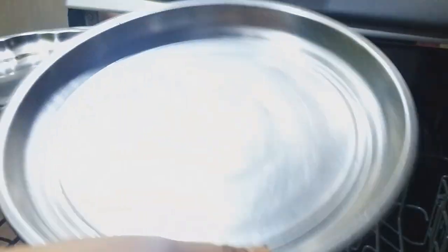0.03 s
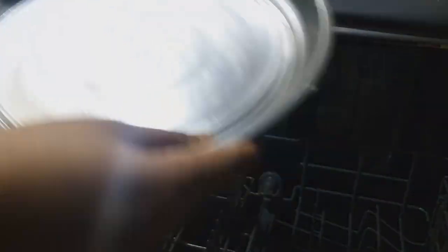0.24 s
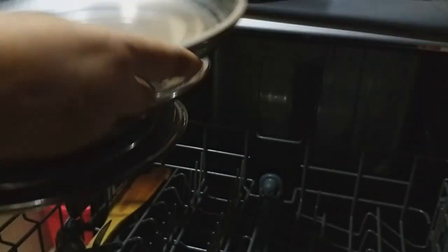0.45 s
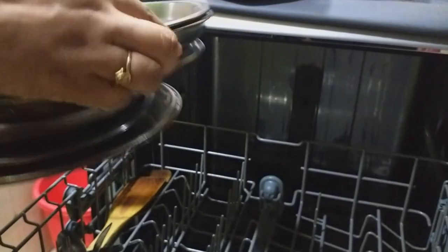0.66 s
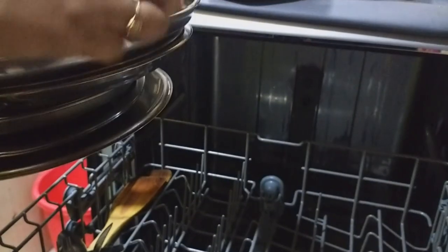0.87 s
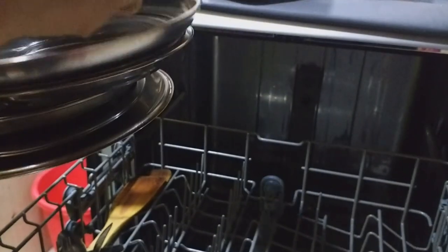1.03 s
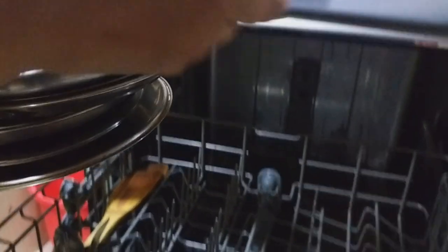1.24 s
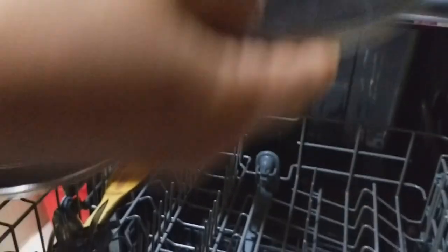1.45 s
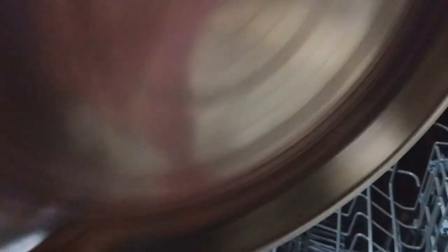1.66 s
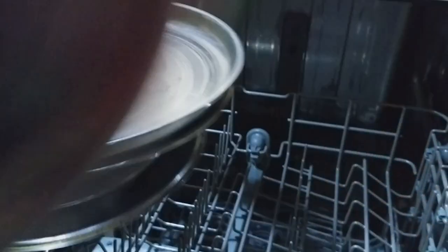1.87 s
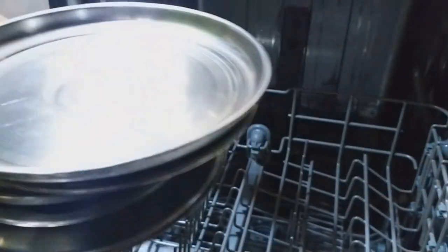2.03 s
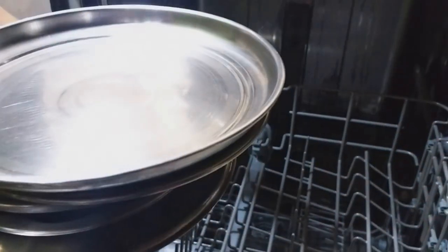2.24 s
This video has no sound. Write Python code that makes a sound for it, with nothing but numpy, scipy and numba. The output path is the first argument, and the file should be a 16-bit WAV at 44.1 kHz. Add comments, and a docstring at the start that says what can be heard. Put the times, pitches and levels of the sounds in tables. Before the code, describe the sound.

Steel plates clatter loudly onto a pile, followed by quieter clinks and shuffling, tiny rim ticks and a brief hand slide, then a bright ringing double clang, close up in a small quiet kitchen.

```python
"""Stacking steel plates

Steel plates are stacked by hand close to a phone in a small kitchen. One crashes and rattles onto the pile,
the pile is shuffled, rims tick, then the top plate is dropped back twice and rings freely.
Each impact is a train of contact forces convolved with decaying modes: sharp lines and dense random swarms.
A plate sings faintly, hands slide and the pile rumbles as shaped noise or modes; a quiet room hums behind."""
import sys
import numpy as np
from scipy import signal
from scipy.fft import rfft, irfft
from scipy.io import wavfile
from numba import njit

SR = 44100
rng = np.random.default_rng(int(sys.argv[2]) if len(sys.argv) > 2 else 0)


def wrap_up_sound(samples):
    """Save the sound to the file named by the first command line argument, as 16-bit audio."""
    columns = np.atleast_2d(samples).T
    # keep every value between -1 and 1, then stretch to whole-number steps
    tamed = np.clip(columns, -1, 1)
    steps = np.round(tamed * 32767).astype(np.int16)
    wavfile.write(sys.argv[1], SR, steps)


def boost(x):
    """Linear amplitude factor 10**(x/20) for a level x in decibels (scalar or array-like)."""
    u = np.asarray(x, float) / 20
    return 10 ** u


N = 99225  # samples in the scene
TOP_HZ = 15900  # upper limit of the modes and of the phone


def on_log(table, hz):
    """Logarithmic frequency scale: interpolates (frequency [Hz], value) points along it."""
    table = np.array(table, float)
    return np.interp(np.log(hz), np.log(table[:, 0]), table[:, 1])


def band(x, lo_hz, hi_hz):
    """Band-pass filtering by a Butterworth response."""
    return signal.sosfilt(signal.butter(2, [lo_hz, hi_hz], "bandpass", fs=SR, output="sos"), x)


def unit(x):
    """Power normalisation: scales to rms 1."""
    return x / np.sqrt(np.mean(x ** 2))


def curve(rows):
    """Amplitude envelope: gain through (time [s], level [dB]) points, fading out beyond the ends."""
    rows = np.array(rows, float)
    t = np.r_[rows[0, 0] - .05, rows[:, 0], rows[-1, 0] + .02]
    level_db = np.r_[-110, rows[:, 1], -110]
    return boost(np.interp(np.arange(N) / SR, t, level_db))


@njit
def decay(pole, left, right, count):
    """Modal superposition: sums exponentially dying sines at both microphones."""
    out = np.zeros((2, count))
    for k in range(len(pole)):
        z = 1 + 0j
        for i in range(count):
            out[0, i] += (z * left[k]).imag
            out[1, i] += (z * right[k]).imag
            z *= pole[k]
            if abs(z.real) + abs(z.imag) < 1e-3:
                break
    return out


def ring(modes, lag_s, scatter=0., pan_db=0., spot_db=0.):
    """Modal impulse response, one second in stereo: the struck spot sets each mode's sign and strength."""
    hz, db, t60 = np.array(modes, float).T
    sign, spot, tilt, phase = rng.standard_normal((len(hz), 4)).T
    pole = np.exp(2j * np.pi * hz / SR - np.log(1000) / (np.maximum(t60, .01) * SR))
    # Scatter blurs left and right, fully so above 2300 Hz.
    blur = scatter * np.minimum(hz / 2300, 1)
    gain = np.sign(sign) * boost(db + spot_db * spot)
    # Panning weakens above 2 kHz.
    pan = pan_db * np.minimum(2000 / hz, 1) + 3 * blur * tilt
    turn = 2 * np.pi * hz * lag_s + blur * phase
    left = gain * boost(pan / 2) + 0j
    right = gain * boost(-pan / 2) * np.exp(-1j * turn)
    return decay(pole, left, right, SR)


def swarm(colour, t60s, lag_s, scatter, pan_db=0., t60_factor=1, count=320):
    """High modal density: close random modes under a spectral colour, starting near rms 1."""
    lo, hi = colour[0][0], min(colour[-1][0], TOP_HZ)
    grid = lo + (hi - lo) * (np.arange(count + 1) / count) ** 1.5
    hz = grid[:-1] + np.diff(grid) * rng.random(count)
    # Wider cells hold more power.
    db = on_log(colour, hz) + 10 * np.log10(np.diff(grid))
    t60 = t60_factor * on_log(t60s, hz) * np.exp(0.13 * rng.standard_normal(count))
    response = ring(np.c_[hz, db, t60], lag_s, scatter, pan_db, spot_db=3)
    return response / np.sqrt(np.sum(boost(db) ** 2))


CONTACTS_PER_S, CONTACT_SPREAD_DB, CHATTER_DB = 550, 4.5, -12.5
SPLIT_HZ = 857, 4920  # borders of lows, mids and treble
FAVOUR_DB, FAVOUR_WIDTH = 1.5, 0.099  # added band's gain; its half-width as a share of the favoured pitch
LEAD = 200  # samples before a contact, for the zero-phase filters to spread into


def rattle(low_db, mid_db, high_db, fade_s, favour_hz, chatter_db):
    """Repeated impact: a first contact and fading random chatter, each band with its own strength."""
    t = np.arange(-LEAD, SR // 5) / SR
    chance, size = rng.random((2, len(t)))
    spread_db = CONTACT_SPREAD_DB * np.minimum(-np.log(size + 1e-9), 2)
    size_db = chatter_db + spread_db - 60 * t / max(fade_s, .005)
    contact = (chance < CONTACTS_PER_S / SR) * (t > 0)
    polarity = np.sign(chance * SR / CONTACTS_PER_S - .5)
    taps = contact * boost(size_db) * polarity
    taps[LEAD] = 1.0  # the first contact
    low, below = (signal.sosfiltfilt(signal.butter(2, hz, fs=SR, output="sos"), taps) for hz in SPLIT_HZ)
    force = boost(low_db) * low + boost(mid_db) * (below - low) + boost(high_db) * (taps - below)
    favoured = band(force, favour_hz * (1 - FAVOUR_WIDTH), favour_hz * (1 + FAVOUR_WIDTH))
    return force + boost(FAVOUR_DB) * favoured


def strike(hits, response, chatter_db=CHATTER_DB, count=SR // 2):
    """Convolution of force with response(time), asked anew for every hit as the plates shift."""
    out = np.zeros((2, N + 2 * SR))
    for s, *force in hits:
        contacts = rattle(*force, chatter_db)
        hit = signal.fftconvolve(contacts[None], response(s)[:, :count], axes=1)
        i = int(s * SR) - LEAD
        out[:, i:i + hit.shape[1]] += hit
    return out[:, :N]


# Sharp modes of the pile: (frequency [Hz])
PILE_HZ = [207, 560, 594, 647, 681, 985, 1132, 1485, 1785, 1674, 2035, 2330, 2774, 3116, 3171, 3223, 3735,
           4496, 5420, 6890]
# The same modes: (relative level [dB], t60 when let go [s])
PILE_MODES = [(-25, 0.34), (-9, 0.25), (-4.5, 0.27), (-18, 0.25), (-8, 0.25), (-11.5, 0.18), (-17.5, 0.21),
              (-9, 0.094), (-25, 0.17), (-23.5, 0.64), (-12.5, 0.21), (-13.5, 0.25), (-18, 0.17),
              (-19.5, 0.067), (-7.5, 0.099), (-15, 0.2), (-20, 0.16), (-23, 0.11), (-16, 0.078),
              (-19.5, 0.2)]
# Dense modes of the pile: colour (frequency [Hz], relative level [dB]), decay when let go (frequency [Hz], t60 [s])
PILE_SWARM = [(71, -67.5), (120, -27), (473, -21.5), (580, -8), (856, -11.5), (1260, -7.5), (3240, -7.5),
              (3520, -10.5), (5520, -12), (16000, -26.5)], [(200, 0.38), (700, 0.34), (2000, 0.23),
              (6000, 0.12), (15000, 0.13)]
# Contacts within the pile: (time [s], lows [dB], mids [dB], treble [dB],
# chatter's fall by 60 dB [s] (5 ms at least), favoured pitch [Hz])
PILE_HITS = [(.0667, -65, -38.5, -36, 0.28, 2930), (.2114, -45, -39, -38, 7.5, 1560),
             (.2245, -54, -38.5, -30, 0.2, 1590), (.2433, -29.5, -8, -9, 0.06, 1450),
             (.262, -15, -14.5, -6.5, -0.1126, 3010), (.278, -20, -10.5, -11, -0.0958, 3200),
             (.2922, -17, -15, -13.5, 0.0764, 3080), (.315, -19.5, -19.5, -18, 0.01, 3560),
             (.345, -28, -27, -30.5, 0.46, 2150), (.43, -34.5, -39, -36.5, 0.75, 1720),
             (.5651, -42, -39, -24, -0.5, 10900), (.5786, -26.5, -34.5, -26.5, 0.14, 1010),
             (.594, -27, -34, -26.5, -0.03, 4680), (.61, -33, -40, -37, 0.94, 903),
             (.6569, -35.5, -37, -32.5, 0.35, 2280), (.7090, -44.5, -36.5, -27, 0.25, 4970),
             (.735, -58, -67, -49, 0.24, 4900), (.8091, -49.5, -43.5, -45, 0.66, 625),
             (.8964, -35.5, -40.5, -28.5, 0.2, 644), (.945, -53, -49, -53, 0.6, 597),
             (1.0286, -50, -51.5, -47.5, -0.62, 2010)]
PILE_LINES_DB, PILE_LAG_S = -2.5, 0.00019  # the right microphone hears later
FREE_S = .2, .54  # the pile is let go between these times
HELD_DAMP = 0.53  # t60 factor of resting hands


def pile():
    """Contact damping: hands resting on the pile shorten its swarm and all but its deepest sharp mode."""
    def response(s):
        """Modal response of the pile, held or let go at this time."""
        damp = 1 if FREE_S[0] < s < FREE_S[1] else HELD_DAMP
        t60_factors = [[1, 1, damp if hz > PILE_HZ[0] else 1] for hz in PILE_HZ]
        lines = np.c_[PILE_HZ, PILE_MODES] * t60_factors
        dense = swarm(*PILE_SWARM, PILE_LAG_S, 2.39, t60_factor=damp, count=440)
        return dense + boost(PILE_LINES_DB) * ring(lines, PILE_LAG_S, 0.65, spot_db=2.5)
    return strike(PILE_HITS, response)


# Sharp modes of the top plate: (frequency [Hz])
TOP_PLATE_HZ = [521, 704, 845, 879, 1074, 1108, 1262, 1320, 1510, 1560, 1588, 1862, 2144, 2246, 2476, 2860,
                2954, 3013, 3316, 3443, 3486, 3807, 3883, 4004, 4286, 4397, 4770, 4966, 5530, 6064, 6099,
                6644, 7321, 2882, 2931, 3682, 5378, 6595, 7246, 7822]
# The same modes: (relative level [dB], t60 [s])
TOP_PLATE_MODES = [(-12, 1.4), (-8.5, 1.6), (-5, 1.6), (1.5, 1.06), (10, 2.76), (-16, 3.7), (-12.5, 5),
                   (-5, 1.17), (9, 0.68), (11.5, 0.6), (0.5, 0.97), (14.5, 0.31), (-15, 0.47), (-33, 0.37),
                   (-10.5, 0.506), (-2, 0.85), (-4.5, 0.93), (-22, 0.13), (-5.5, 2.4), (2, 0.26),
                   (-8.5, 1.03), (-4.5, 0.98), (-12.5, 1.1), (0.5, 0.42), (-11.5, 1.1), (-14, 1.4),
                   (-8.5, 0.47), (-6.5, 0.36), (-16, 0.71), (2, 0.38), (-10.5, 0.87), (-17.5, 1.7),
                   (-22, 0.62), (-8, 0.67), (-16.5, 1.3), (-18, 0.75), (-21, 0.74), (-8.5, 0.24),
                   (-30.5, 0.22), (-31, 0.2)]
# Sharp modes of the plate beneath: (frequency [Hz])
UNDER_PLATE_HZ = [391, 567, 1285, 2362, 2519, 3370, 4342, 4783, 5608, 6950, 7908, 8296, 9549, 11372]
# The same modes: (relative level [dB], t60 [s])
UNDER_PLATE_MODES = [(-8, 0.14), (-12, 0.64), (-3, 0.74), (-2, 0.034), (-6, 0.38), (-12, 0.6), (-18, 0.81),
                     (-20, 0.93), (0.5, 0.076), (2, 0.096), (-10.5, 0.069), (-6.5, 0.062), (-4, 0.041),
                     (-0.5, 0.116)]
# Dense modes of the plates: colour (frequency [Hz], relative level [dB]), decay (frequency [Hz], t60 [s])
PLATE_SWARM = [(47, -63), (80, -18.5), (858, -4.5), (1370, -23), (2180, -7.5), (2780, -29.5), (5520, -17.5),
               (6170, -16), (6740, -15.5), (7870, -16), (16000, -21)], [(200, 0.047), (700, 0.16),
               (2000, 0.22), (6000, 0.1), (15000, 0.061)]
# Colour of faint modes between the plate's tones: (frequency [Hz], relative level [dB])
SHIMMER = [(300, -7), (4500, -8), (10000, -30)]
# Contacts of the two drops: (time [s], lows [dB], mids [dB], treble [dB],
# chatter's fall by 60 dB [s] (5 ms at least), favoured pitch [Hz])
PLATE_HITS = [(1.8432, -14, -16, -12, 0.067, 2186), (1.8515, -32.5, -24.5, -16.5, 0.04, 6660),
              (1.8575, -29, -13, -15, 0.042, 2270), (1.947, -37, -24.5, -21, 0.068, 2930),
              (1.954, -39, -25, -28, 0.08, 2310)]
PLATE_LINES_DB, UNDER_DB, SHIMMER_DB = -13.5, -3.5, -23
SHIMMER_LONGER = 9.5  # t60 factor of the shimmer
PLATE_LAG_S, PLATE_PAN_DB = 0.0004022, 4.5  # right hears later; the lows lean left


def dropped_plate():
    """Free vibration: the first contact of each drop starts sharp modes, every contact a dense swarm."""
    top = boost(PLATE_LINES_DB) * ring(np.c_[TOP_PLATE_HZ, TOP_PLATE_MODES], PLATE_LAG_S, 0, PLATE_PAN_DB)
    under = boost(UNDER_DB) * ring(np.c_[UNDER_PLATE_HZ, UNDER_PLATE_MODES], PLATE_LAG_S, 0, PLATE_PAN_DB)
    shimmer = boost(SHIMMER_DB) * swarm(SHIMMER, PLATE_SWARM[1], PLATE_LAG_S, 1, PLATE_PAN_DB,
                                      SHIMMER_LONGER, count=240)
    free = top + under + shimmer
    clatter = strike(PLATE_HITS, lambda s: swarm(*PLATE_SWARM, PLATE_LAG_S, 0.98, PLATE_PAN_DB))
    first_contacts = PLATE_HITS[::3]
    return clatter + strike(first_contacts, lambda s: free, chatter_db=-np.inf, count=SR)


# Dense modes of the rims: colour (frequency [Hz], relative level [dB]), decay (frequency [Hz], t60 [s])
RIM_SWARM = [(590, -39), (1000, -8), (1160, -17), (1940, -2), (2980, -7.5), (7440, -4.5), (9380, -11),
             (13000, -7), (16000, -18)], [(1000, 0.084), (4000, 0.11), (15000, 0.12)]
# Rim ticks: (time [s], lows [dB], mids [dB], treble [dB],
# chatter's fall by 60 dB [s] (5 ms at least), favoured pitch [Hz])
RIM_HITS = [(1.1992, -69, -39.5, -60.5, 0.025, 1830), (1.3465, -58.5, -53.5, -38.5, 0.06, 1900),
            (1.3518, -62, -39.5, -52, 0.033, 5500)]
RIM_LAG_S = 0.000057  # the right microphone hears later


def rim_ticks():
    """Impulsive excitation: small contacts start quickly dying dense modes of the rims."""
    return strike(RIM_HITS, lambda s: swarm(*RIM_SWARM, RIM_LAG_S, 1.4, count=200))


# Modes of a plate that sings on from late in the shuffle: (frequency [Hz], relative level [dB], t60 [s])
SINGING = [(487, -12, 7.8), (871, 1, 7.6), (1260, -5.5, 3.7), (2330, -9.5, 2.0)]
SINGING_START_S, SINGING_DB = 0.81, -59


def singing_plate():
    """Light damping: a few long-lived modes swell in over 40 ms and sing faintly for a second."""
    out = np.zeros((2, N))
    i = int(SINGING_START_S * SR)
    onset = np.minimum(np.arange(SR) / SR / 0.04, 1)
    out[:, i:i + SR] = boost(SINGING_DB) * ring(SINGING, PILE_LAG_S) * onset
    return out


def plates():
    """Summation: plate sounds are added and cut below 220 Hz, removing low leakage of the modes' sudden onsets."""
    out = pile() + dropped_plate() + rim_ticks() + singing_plate()
    return signal.sosfilt(signal.butter(3, 220, "highpass", fs=SR, output="sos"), out)


ROOM_T60_S, ROOM_DB = 0.22, -14


def room(dry):
    """Diffuse reverberation: dense reflections of a small hard kitchen, different at each microphone."""
    t = np.arange(SR // 2) / SR
    tail = rng.standard_normal((2, len(t))) * boost(-60 * t / ROOM_T60_S) * (t > .004)
    tail = band(tail, 220, 9000)
    tail = tail / np.sqrt(np.sum(tail ** 2) / 2)
    return boost(ROOM_DB) * signal.fftconvolve(dry, tail, axes=1)[:, :N]


# Hands sliding on steel: (time [s], level before the grain [dB])
SLIDE = [(1.42, -79.5), (1.55, -67), (1.63, -62.5), (1.72, -65.5), (1.82, -82)]


def sliding_hands():
    """Friction noise: treble noise made grainy by a random 10-80 Hz level swing of 2.1 dB rms."""
    grain = boost(2.1 * unit(band(rng.standard_normal(N), 10, 80)))
    return unit(band(rng.standard_normal((2, N)), 2900, 14000)) * grain * curve(SLIDE)


# Rumble of the pile as it is carried near: (time [s], level [dB])
RUMBLE = [(1.65, -82), (1.95, -65), (2.03, -43.5), (2.1, -51.5), (2.16, -52), (2.25, -57)]


def rumble():
    """Partial coherence: low noise is mostly shared by the two microphones."""
    shared, apart = band(rng.standard_normal((2, N)), 110, 390)
    return unit(shared + 0.24 * apart * np.array([[1], [-1]])) * curve(RUMBLE)


# Colour of the room hum: (frequency [Hz], relative level [dB])
FLOOR = [(20, -26), (60, -16.5), (120, -13), (250, -15.5), (450, -2.5), (700, -4), (1200, -11), (2500, -15),
         (6000, -23), (16000, -31)]
FLOOR_DB = -60.5  # rms of the mean of both microphones


def room_hum():
    """Spatial coherence of stationary noise: the hum is more alike left and right in the bass."""
    hz = np.maximum(np.fft.rfftfreq(N, 1 / SR), 1)
    mid, side = rfft(rng.standard_normal((2, N))) * boost(on_log(FLOOR, hz))
    side = side * np.clip(hz / 1200, .2, 1)
    hum = irfft(np.array([mid + side, mid - side]), N)
    return hum * boost(FLOOR_DB) / np.sqrt(np.mean(hum.mean(0) ** 2))


def scene():
    """Linear superposition: plates and their reverberation over hands, rumble and hum."""
    dry = plates()
    return dry + room(dry) + sliding_hands() + rumble() + room_hum()


def top_cut(x):
    """Nothing passes above the cut-off."""
    return signal.sosfilt(signal.butter(12, 16960, fs=SR, output="sos"), x)


def record(dry):
    """Saturation and band-limiting: the phone rounds the loudest peaks and cuts the top."""
    rounded = np.tanh(dry)
    mix = signal.sosfilt(signal.ellip(8, .2, 40, TOP_HZ, fs=SR, output="sos"), rounded)
    return top_cut(mix)


dry = scene()
out = record(dry)
wrap_up_sound(out)
```